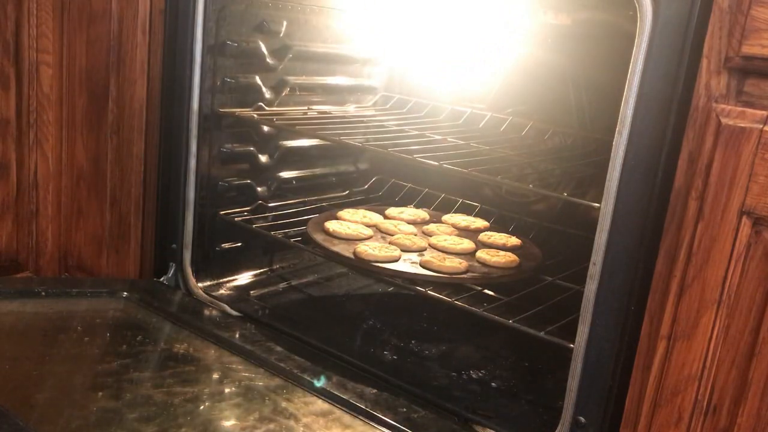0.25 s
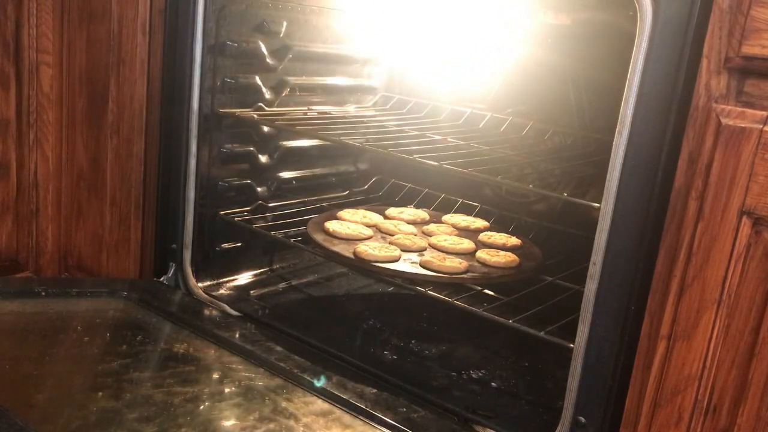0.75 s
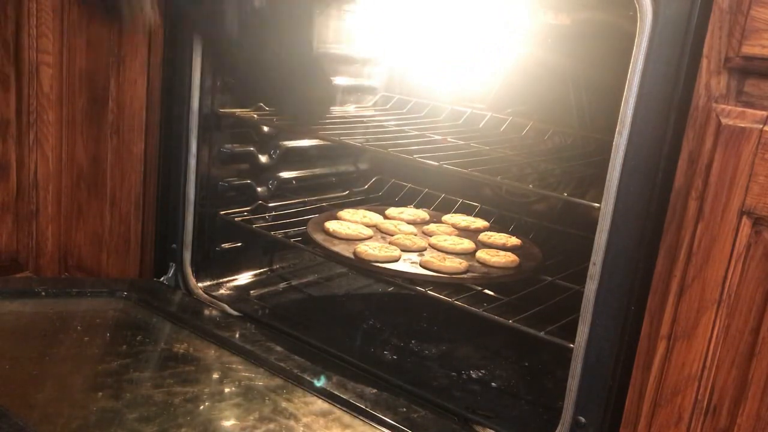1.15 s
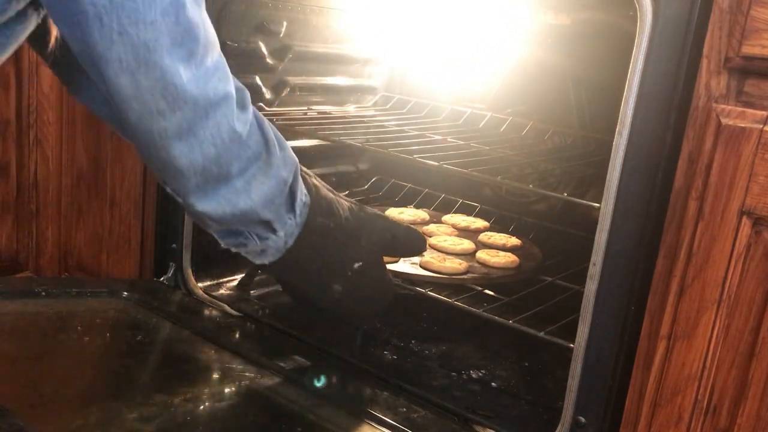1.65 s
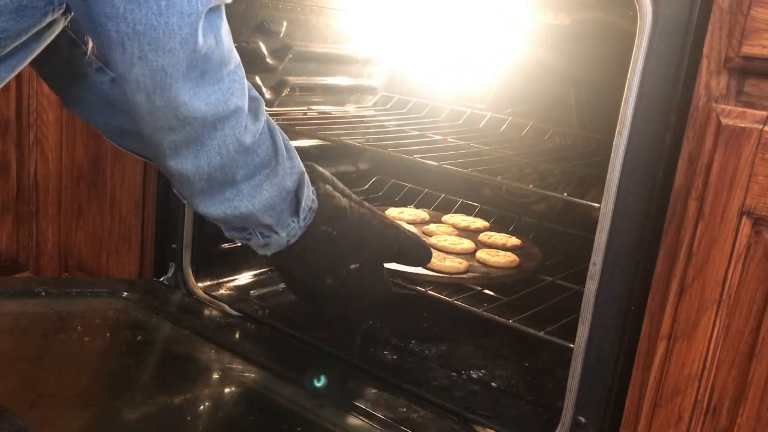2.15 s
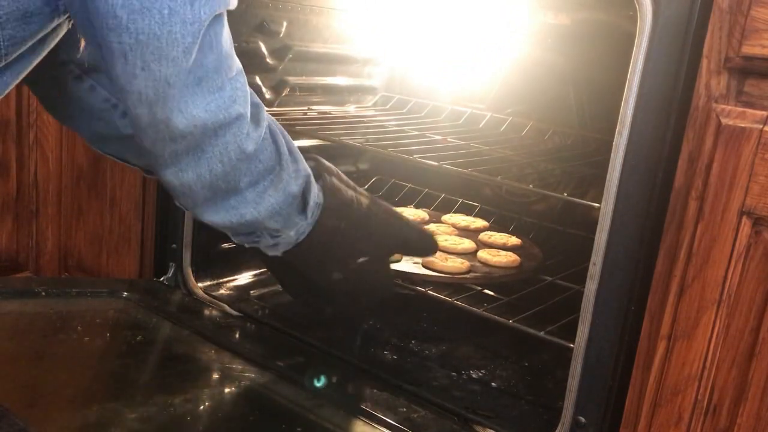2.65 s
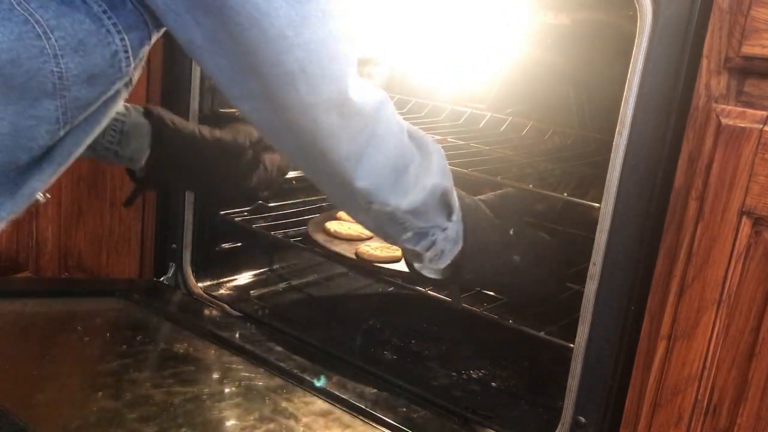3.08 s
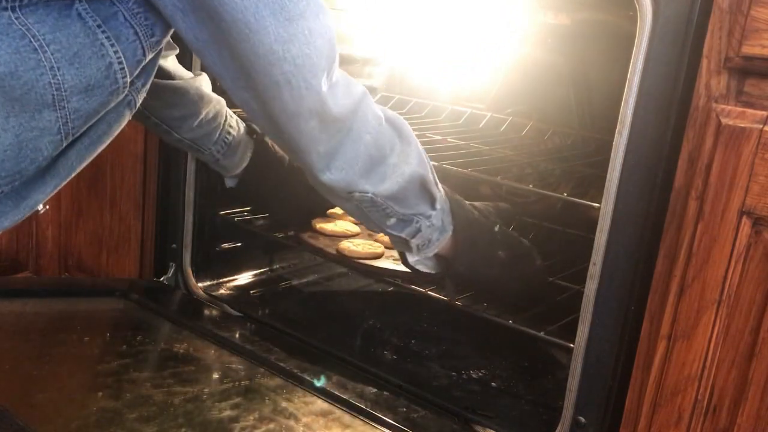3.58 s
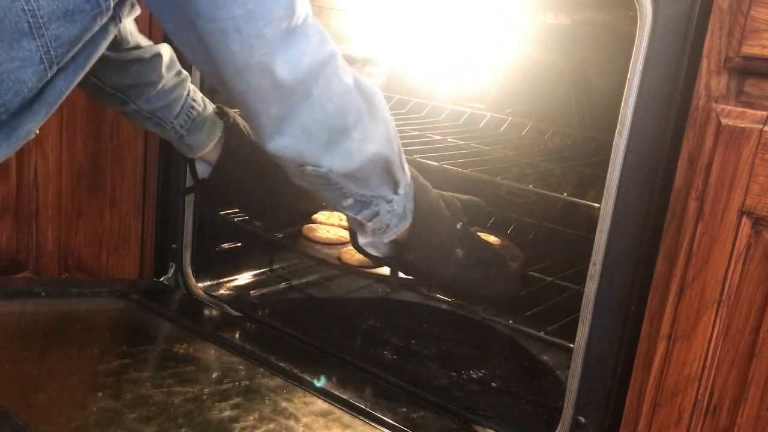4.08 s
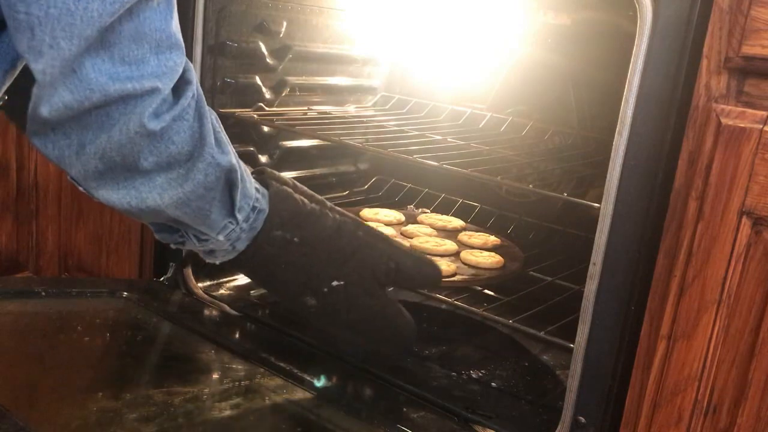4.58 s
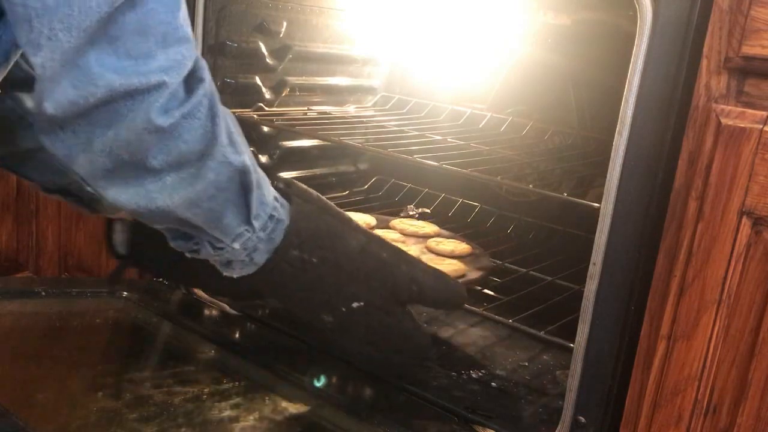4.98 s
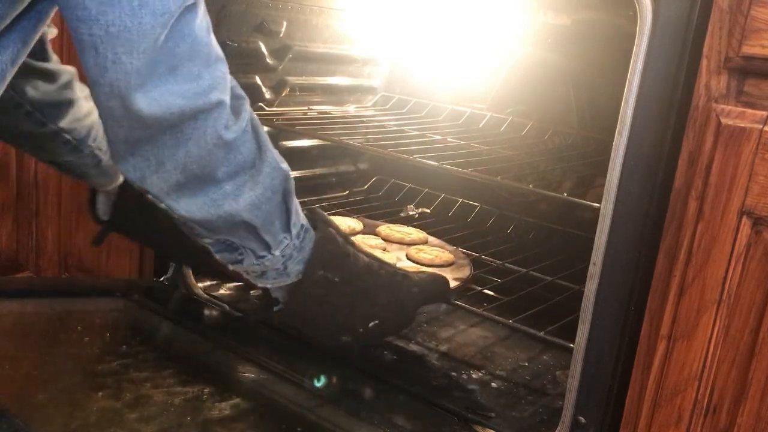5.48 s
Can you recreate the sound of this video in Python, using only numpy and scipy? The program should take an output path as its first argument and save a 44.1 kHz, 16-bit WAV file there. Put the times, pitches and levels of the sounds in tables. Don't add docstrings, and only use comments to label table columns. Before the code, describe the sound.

Close, nearly centred pickup beside an open oven. Two loud, dry wooden raps with low thumps open the scene. After a hushed stretch of tiny ticks and faint glove brushing, a metal pan nudges, scrapes and squeaks on wire bars, drops with a clank, catches, then bangs down in a rapid clatter. A ringing rack and last small scrapes close it, in a small, lightly reverberant kitchen.

```python
import sys
import numpy as np
from scipy import signal
from scipy.fft import rfft, irfft
from scipy.io import wavfile

SR = 44100
rng = np.random.default_rng(int(sys.argv[2]) if len(sys.argv) > 2 else 0)


def gain_from_db(level_db):
    decades = np.asarray(level_db, float) / 20
    return 10 ** decades


def wrap_up_sound(samples):
    columns = np.atleast_2d(samples).T
    tamed = np.clip(columns, -1, 1)
    steps = np.round(tamed * 32767).astype(np.int16)
    wavfile.write(sys.argv[1], SR, steps)


N = 252693

# (frequency [Hz], density [dB per Hz])
AIR_SPECTRUM = [(15, -32), (25, 8.5), (70, 1.5), (317, -1.5), (516, -6), (2220, -18.5), (2990, -15),
                (4870, -20.5), (12900, -27), (14800, -21.5), (16000, -68)]
AIR_DB = -64.5
# (frequency [Hz], t60 [s])
ROOM_DECAY = [(60, 0.72), (160, 0.49), (420, 0.43), (1100, 0.49), (2910, 0.5), (7680, 0.36)]
# (delay [s], level [dB])
ECHOES = [(.0021, -30), (.0078, -12.5), (0.017, -17), (0.022, -46)]

# (time [s], hold [s], level [dB], fall [dB/s])
TREADS = [(.27, 0.018, -24, 339), (.43, 0.042, -38, 99), (0.891, 0.01, -20.5, 425.5),
          (1.04, 0.04, -37, 143), (1.25, 0.43, -51, 200), (1.721, 0.025, -54.5, 21), (2.89, 0.26, -49, 60),
          (3.58, 0.22, -35.5, 43), (4.2, 0.42, -51, 26), (4.79, 0.12, -43.5, 22), (5.0, 0.029, -29.5, 172),
          (5.2, 0.013, -38, 71), (5.53, .03, -48, 85), (5.72, .02, -45, 68)]
TREAD_RISE_DB_PER_S = 750

# (time [s], peak [dB], snap pitch [Hz], woody body [dB re snap], body t60 [s])
KNOCKS = [(0.2486, -6, 2960, -8, 0.075), (0.2485, -10.5, 1660, -35.5, 0.056),
          (0.2576, -18.5, 3000, -35, .35), (0.264, -26, 3240, -26, .05), (.395, -27.5, 3000, -8, 0.097),
          (0.868, -21, 2435, -13, 0.046), (0.8691, -10.5, 2460, -7.5, 0.027),
          (0.8704, -15, 2340, -1.5, 0.057), (0.8721, -8.5, 2580, -2.5, 0.037),
          (0.8738, -12.5, 3900, -25.5, 0.031), (0.8753, -14.5, 3270, -12.5, 0.7),
          (0.88, -27, 3150, -18, 0.065)]
# (frequency [Hz], level [dB])
CABINET_BODY = [(88, -32), (150, 3.5), (278, -7.5), (833, -10.5), (1460, -9), (2400, -14), (4400, -20),
                (15000, -28.5)]
# (time [s], peak [dB], centre [Hz], width [Hz])
THROWN = [
    (0.2482, -5.5, 3075, 1480),
    (.2487, -13.5, 1700, 500),
    (.395, -25, 3000, 1500),
    (.871, -1, 2700, 1700),
    (.871, -11.5, 1090, 900),
]
SNAP_WIDTH = 0.12
SPLINTER_DB, SPLINTER_T60_S = -26, .002

# (time [s], peak [dB], pitch [Hz], t60 [s], deep boom [dB re note])
BUMPS = [(0.108, -51, 227, 0.2, -20), (0.255, -31, 313, 0.23, -24), (0.273, -11.5, 245, 0.027, -9),
         (0.403, -33, 173.5, 0.16, -0.5), (0.869, -23.5, 330, 0.072, 2.5), (0.876, -30.5, 524, 0.1, -7.5),
         (0.907, -23.5, 185, 0.074, -8), (1.027, -50, 127, 0.044, 10.5), (1.183, -59.5, 121, 0.1, 6),
         (1.684, -41.5, 235, 0.095, -7), (1.873, -46, 227.7, 0.19, -26), (2.627, -47.5, 237, 0.087, -22),
         (2.728, -45, 229, 0.2, -19), (3.042, -40, 213, 0.15, -10), (3.374, -54.5, 330, 0.21, -2.5),
         (3.512, -33, 170, 0.32, -9), (4.244, -38.5, 227, 0.21, -9.5), (4.579, -48, 303, 0.13, -4),
         (4.762, -41.5, 219, 0.3, -18), (4.909, -33.5, 208.5, 0.24, -5), (5.071, -16.5, 196, 0.057, -24),
         (5.189, -25, 244, 0.12, -3.5), (5.53, -37.5, 241.5, 0.28, -4)]
LIGHT_BOOM_HZ, HEAVY_BOOM_HZ, HEAVY_FROM_DB = 103.6, 68.7, -37

# (time [s], hold [s], level [dB])
RUSTLES = [(.42, .2, -60), (.7, .15, -67.5), (0.951, 0.26, -63.5), (1.2, .15, -66), (1.38, 0.23, -65.5),
           (2.151, 0.072, -67.5), (2.45, 0.015, -70.5), (2.726, 0.16, -59), (2.99, 0.058, -59),
           (3.15, 0.0083, -64.5), (3.22, 0.026, -60.5), (3.389, 0.0023, -62.5), (3.562, 0.026, -45),
           (3.66, 0.074, -58.5), (3.78, 0.2, -51.5), (4.04, 0.067, -61.5), (4.14, 0.054, -55),
           (4.256, 0.0018, -52), (4.47, 0.016, -67), (4.591, 0.005, -62), (4.77, 0.012, -78),
           (4.91, 0.19, -44), (5.07, 0.0052, -38), (5.17, 0.017, -52), (5.33, 0.054, -62.5),
           (5.541, 0.2, -52.5), (5.67, .1, -46)]
RUSTLE_RISE_DB_PER_S, RUSTLE_FALL_DB_PER_S = 219, 177
# (time [s], hold [s], level [dB])
SWISHES = [(1.755, 0.0088, -80), (2.211, .01, -66), (2.74, 0.11, -57.5), (3.0, 0.019, -59),
           (3.15, .008, -66), (3.22, 0.052, -57), (3.38, 0.0091, -63), (3.58, .025, -59), (3.8, .15, -59),
           (4.18, 0.018, -56), (4.48, 0.0091, -65), (4.59, .006, -76), (4.96, 0.093, -64), (5.17, .02, -57),
           (5.33, 0.049, -64.5), (5.53, .05, -66), (5.62, 0.1, -50)]
SWISH_RISE_DB_PER_S, SWISH_FALL_DB_PER_S, SWISH_FROM_HZ = 250, 334, 5200

# (start [s], end [s], pitch [Hz], width [Hz], level [dB])
WHINES = [(3.48, 3.56, 4250, 120, -64), (3.55, 3.6, 3120, 150, -52), (3.78, 4.0, 3880, 60, -62),
          (3.84, 3.98, 6610, 60, -66), (3.98, 4.25, 4250, 60, -66), (4.08, 4.25, 5800, 60, -68),
          (5.495, 5.6, 2150, 300, -60), (5.58, 5.73, 4100, 90, -60), (3.692, 3.712, 3240, 150, -43),
          (4.0, 4.25, 2770, 50, -63), (4.13, 4.25, 7500, 220, -62), (5.335, 5.47, 850, 14, -59),
          (5.31, 5.5, 786, 8, -59), (3.752, 3.79, 2900, 120, -57), (3.752, 3.84, 1730, 40, -58),
          (3.752, 3.86, 1120, 90, -58), (3.85, 3.91, 3070, 110, -57), (3.85, 3.89, 2500, 90, -61),
          (3.895, 3.97, 1080, 80, -57), (3.22, 3.32, 1680, 90, -69)]

# (time [s], rack level [dB], pan level [dB])
STRIKES = [
    (1.684, -75, -79),
    (3.045, -55.5, -60),
    (3.512, -56, -56.5),
    (3.694, -61, -56.5),
    (4.246, -54, -48),
    (4.761, -52, -54.5),
    (4.911, -64, -59),
    (5.071, -57, -48),
    (5.2, -39, -72),
    (5.525, -46, -56),
]
# (pitch [Hz], level [dB], t60 [s])
RACK_MODES = [(323, -2, .9), (780, -8, 1.0), (850, -1, .55), (890, -10, .6), (1163, -8, .3),
              (1500, -10, .5), (1600, -11, .4), (2600, -18, .45), (2864, -20, .7), (3042, -22, .6),
              (3885, -23, .7), (4070, -19, .3)]
# (pitch [Hz], level [dB], t60 [s])
PAN_MODES = [(506, -3, .4), (806, -8, .8), (867, -5, 1.6), (880, -9, 1.2), (937, -6, 1.6), (1044, -1, .75),
             (1583, -7, .6), (1642, -7, .7), (1723, -2, 1.3), (2380, -10, .35), (2748, -8, .9),
             (2920, -14, .5), (4371, -20, .35), (5696, -20, .33)]

# (pitch [Hz], level [dB], t60 [s])
NOTES_NUDGE = [(495, -4, 0.091), (955, 2, 0.11), (990, -6, 0.27), (1570, -1, 0.098), (2150, -7, 0.093),
               (2510, -1, .07), (3080, -8, 0.077), (3700, -2, .08)]
NOTES_DROP = [(900, -6, 0.13), (1046, -16, 0.17), (1520, -3.5, 0.13), (1960, -11, .1), (2125, -4.5, 0.098),
              (2750, -5, 0.065), (3620, -3, 0.081), (3900, 3, 0.064)]
NOTES_CATCH = [(715, 3, 0.12), (1480, 4.5, 0.29), (1850, -10, .15), (2800, -2, 0.098), (3150, -6, .08),
               (3461, -13, .08)]
NOTES_PULL = [(1200, 4, 0.092), (1610, -3, 0.22), (2112, 1.5, 0.13), (2250, -8, 0.093), (3040, -1, .1),
              (3680, -20, 0.067), (4430, -16, 0.069)]
NOTES_BOUNCE = [(1320, -3, .08), (1520, -2, .12), (2719, -5, .1), (3420, 0, 0.084), (3903, -7, .1),
                (4280, -2, 0.11)]
NOTES_CRASH = [(1174, 1, .12), (1377, -1.5, 0.16), (1593, -5.5, 0.23), (1949, -2, 0.095),
               (2270, -1.5, 0.06), (2650, -6.5, .15), (2990, -0.5, .1), (3330, -9, 0.083),
               (4340, -0.5, 0.064)]
# (time [s], level [dB], notes [table])
CLANKS = [
    (3.042, -43, NOTES_NUDGE),
    (4.2444, -36.5, NOTES_DROP),
    (4.759, -42, NOTES_CATCH),
    (4.91, -30, NOTES_PULL),
    (5.012, -33, NOTES_BOUNCE),
    (5.071, -29, NOTES_CRASH),
    (5.079, -34.5, NOTES_CRASH),
]

# (time [s], peak [dB], centre [Hz], t60 [s], dull part [dB])
TICKS = [(3.043, -43, 9000, .03, -10), (1.752, -56, 13000, .04, -30), (2.203, -43, 13500, .03, -30),
         (2.206, -54, 2050, .04, -6), (2.452, -58, 6900, .06, -20), (5.502, -38, 2100, .04, -4),
         (5.524, -34, 1150, .06, -2)]
# (time [s], peak [dB], crack centre [Hz], chatter t60 [s], dull part [dB])
CATCHES = [(1.682, -44, 900, 0.03, 7), (1.696, -46, 2930, 0.06, 1), (1.751, -57, 1570, 0.034, -11),
           (2.202, -35.5, 6780, 0.027, -5.5), (2.204, -41.5, 11150, 0.026, -21),
           (2.451, -53.5, 3000, 0.028, 2), (3.04, -39, 960, 0.057, -2), (3.043, -38, 1570, 0.067, 0),
           (3.044, -30, 2450, 0.048, 11), (3.379, -43, 2840, 0.015, -2), (3.499, -43, 1900, 0.079, 15),
           (3.516, -39, 3000, 0.072, 0), (3.558, -54, 3000, .05, 2), (3.573, -31, 3000, 0.051, -4),
           (3.588, -25, 2860, 0.018, 5), (3.607, -35, 2780, 0.041, 15), (3.693, -28.5, 3130, 0.033, 3),
           (3.757, -36.5, 2740, 0.099, 4), (4.587, -48, 3300, 0.04, -5.5), (4.758, -29.5, 2660, 0.053, -1),
           (5.581, -41, 1520, 0.0398, -10), (5.674, -36, 3000, 0.0495, 6), (5.563, -54, 1954, 0.05, -2)]
# (time [s], peak [dB], crack centre [Hz], dull part [dB])
LANDINGS = [(4.244, -26, 1650, -7), (4.246, -30.5, 923, -26), (4.25, -25.5, 2110, 0),
            (4.907, -29, 2840, -3), (4.913, -18.5, 1920, 16), (4.925, -24.5, 2250, 12),
            (4.955, -25, 2000, -8), (4.979, -26.5, 1880, 1), (5.009, -22, 3440, 11),
            (5.015, -20.5, 1550, 3), (5.026, -19, 1520, 10), (5.067, -15, 2420, 11),
            (5.073, -12.5, 2150, 12), (5.081, -16, 1580, -3.5), (5.097, -17.5, 1540, 17.5),
            (5.106, -34, 2850, 7), (5.121, -35, 1070, 0), (5.203, -39, 704, 3)]
LANDING_T60_S = 0.054
CATCH_RISE_S, LANDING_RISE_S = 0.0067, 0.0024
CATCH_TREBLE_DB, LANDING_TREBLE_DB, TICK_TREBLE_DB = -10.5, -19, -41

# (time [s], hold [s], scrape level [dB], shell rumble [dB re
# scrape], squeal [dB re scrape])
PULLS = [(.41, 0.015, -56.5, 4.5, -35), (.62, 0.29, -67.5, -12, -27), (1.0, 0.11, -88, -9, -30),
         (1.25, 0.3, -76, 0, -27), (1.706, 0.011, -58, 8.5, -26), (2.17, 0.024, -67.5, -1, -28.5),
         (2.69, 0.14, -73, -14, 7), (2.997, 0.13, -61, 3, -1), (3.23, 0.023, -67.5, 5.5, 9.5),
         (3.39, 0.0046, -61.5, 4.5, -25), (3.57, 0.029, -44, 6, -9.5), (3.697, 0.0081, -48.5, 7.5, -3.5),
         (3.76, 0.2, -55, 4.5, 4.5), (4.04, 0.15, -62, 2, -7), (4.27, 0.026, -58, 7.5, 4),
         (4.42, 0.12, -67.5, 4, -17), (4.59, 0.045, -62.5, 0.5, -10), (4.776, 0.12, -50, -1, -0.5),
         (4.909, 0.11, -40.5, -10, -25), (5.015, .04, -38.5, -14, -22), (5.054, 0.066, -31, -7.5, -36),
         (5.22, 0.2, -60.5, 15, -15), (5.536, 0.041, -43, 4.5, -34), (5.66, .1, -50.5, -7, -7)]
PULL_RISE_DB_PER_S, PULL_FALL_DB_PER_S, SHELL_FALL_DB_PER_S = 429, 132, 61
# (pitch [Hz], width [Hz], level [dB])
SHELL_MODES = [(116, 11, -17), (170, 20, -0.5), (239.4, 18, 1), (326.5, 6.5, 4), (430, 120, -8.5)]
# (pitch [Hz], width [Hz], level [dB])
SQUEAL_MODES = [(330, 140, 0), (730, 63, -10.5), (1170, 79, -10), (1680, 26, -12.5), (2590, 45, -11),
                (3000, 120, -5), (3970, 250, -8.5), (8940, 200, -13.5)]
# (frequency [Hz], density [dB per Hz])
SCRAPE_SPECTRUM = [(260, 6.5), (450, 0.5), (553, 6.5), (1060, 5), (1280, 6), (2120, -5), (2460, -6),
                   (2960, -11), (3640, -44.5), (7000, -17.5), (9100, -71.5), (15400, -120)]
# (frequency [Hz], density [dB per Hz])
HISS_SPECTRUM = [(880, -37), (1500, 3), (2400, 2.5), (4250, 1.5), (5000, -2.5), (6550, -1), (10500, -8),
                 (14800, -8.5)]
IDLE_SCRAPE_DB, IDLE_RUMBLE_DB, IDLE_HISS_DB, IDLE_TREAD_DB = -75, -73.5, -80.5, -78.5


def unit_rms(x):
    return x / np.sqrt(np.mean(x ** 2) + 1e-20)


def unit_peak(x):
    return x / np.max(np.abs(x))


def at_hz(points, hz):
    points = np.array(points)
    return np.interp(np.log(hz), np.log(points[:, 0]), points[:, 1])


def add(out, s, piece):
    start = round(s * SR)
    out[start:start + len(piece)] += piece[:len(out) - start]


def drift(rate_hz):
    hop, settle = 40, 2000
    r = np.exp(-2 * np.pi * rate_hz * hop / SR)
    white = rng.standard_normal(N // hop + 2 + settle)
    slow = signal.lfilter([1], [1, -2 * r, r * r], white)[settle:]
    return np.interp(np.arange(N) / hop, np.arange(len(slow)), unit_rms(slow))


def low_pass(x, hz):
    return signal.lfilter(*signal.butter(2, min(hz, .45 * SR), fs=SR), x)


def resonance(x, hz, width_hz):
    r = np.exp(-np.pi * width_hz / SR)
    top = np.array([1, 0, -1]) * (1 - r * r) / 2
    return signal.lfilter(top, [1, -2 * r * np.cos(2 * np.pi * hz / SR), r * r], x)


def bands():
    edges = 28 * 2 ** np.arange(0, 9.6, .5)
    return [(np.sqrt(low * high), signal.butter(2, [low, high], "band", fs=SR, output="sos"))
            for low, high in zip(edges, edges[1:])]


def coloured(x, spectrum):
    hz = np.maximum(np.fft.rfftfreq(len(x), 1 / SR), 1)
    below = np.maximum(np.log2(spectrum[0][0] / hz), 0)
    above = np.maximum(np.log2(hz / spectrum[-1][0]), 0)
    gain = gain_from_db(at_hz(spectrum, hz) - 8.0 * (below + above))
    return unit_rms(irfft(rfft(x) * gain, len(x)))


def grit(per_s, spread_db, size):
    strengths = gain_from_db(spread_db * np.minimum(rng.exponential(1, size), 4))
    strengths = strengths * rng.choice([-1, 1], size)
    return unit_rms(strengths * (rng.random(size) < per_s / SR))


def swells(s, held_s, level_db, rise, fall, idle_db):
    t = np.arange(0, N + 64, 64)[:, None] / SR
    before = np.maximum(s - t, 0)
    after = np.maximum(t - s - held_s, 0)
    each_db = level_db - rise * before - fall * after
    power = np.sum(gain_from_db(each_db) ** 2, axis=1) + gain_from_db(idle_db) ** 2
    return np.interp(np.arange(N) / SR, t[:, 0], 10 * np.log10(power))


def room_air():
    mid = gain_from_db(AIR_DB) * coloured(rng.standard_normal(N), AIR_SPECTRUM)
    side = coloured(rng.standard_normal(N), AIR_SPECTRUM)
    return mid, gain_from_db(AIR_DB - 29.5) * np.diff(side, prepend=0)


def kitchen(x, tail_db, side_db):
    t = np.arange(int(.7 * SR)) / SR
    white, tail = rng.standard_normal((2, 2, len(t))), 0
    for k, (hz, band) in enumerate(bands()):
        fade = gain_from_db(-60 * t / at_hz(ROOM_DECAY, hz))
        tail = tail + signal.sosfilt(band, white[k % 2]) * fade
    tail = gain_from_db(tail_db) * tail * np.minimum(t / 0.0013, 1)
    for s, db in ECHOES:
        tail[0, round(s * SR)] += gain_from_db(db)
    mid, side = signal.fftconvolve(x[None], tail, axes=1)[:, :N]
    return mid, gain_from_db(side_db) * (np.diff(side, prepend=0) + .06 * low_pass(side, 500))


def tread():
    s, held_s, level_db, fall = np.transpose(TREADS)
    push = rng.standard_normal(N)
    upper = resonance(resonance(push, 69.7, 47), 69.7, 47)
    lower = resonance(resonance(push, 48, 25), 48, 25)
    effort_db = swells(s, held_s, level_db, TREAD_RISE_DB_PER_S, fall, IDLE_TREAD_DB)
    return gain_from_db(effort_db - 10.0) * unit_rms(upper - 0.51 * lower)


def knocks():
    out, sent, t = np.zeros(N), np.zeros(N), np.arange(SR // 2) / SR
    click = 1. * (t == 0)
    blow = resonance(low_pass(low_pass(click, 11000), 11000), 3730, 3900)
    edge = 0.069 * resonance(blow, 5800, 1500) + 0.036 * resonance(blow, 8200, 6000)
    for s, peak_db, hz, body_db, t60 in KNOCKS:
        white, body = rng.standard_normal((2, len(t))), 0
        splinters = gain_from_db(SPLINTER_DB - 60 * t[:160] / SPLINTER_T60_S) * white[0, -160:]
        crumbs = click[:160] + splinters
        snap = resonance(blow, hz, SNAP_WIDTH * hz) + signal.lfilter(crumbs, 1, edge)
        for k, (centre, band) in enumerate(bands()):
            fade = gain_from_db(-60 * t / (t60 * (centre / 1000) ** -.3))
            onset = np.minimum(t * centre, 1)
            wood = signal.sosfilt(band, white[k % 2] * fade * onset)
            body = body + gain_from_db(at_hz(CABINET_BODY, centre)) * wood
        body = gain_from_db(peak_db + body_db) * unit_peak(body)
        add(out, s, gain_from_db(peak_db) * unit_peak(snap) + body)
        add(sent, s, body)
    for s, peak_db, hz, width_hz in THROWN:
        pulse = resonance(blow, hz, width_hz) + 1.5 * edge
        add(sent, s, gain_from_db(peak_db) * unit_peak(pulse))
    return out, sent


def bumps():
    out, t = np.zeros(N), np.arange(SR // 2) / SR
    for s, peak_db, hz, t60, boom_db in BUMPS:
        boom_hz = np.interp(peak_db - HEAVY_FROM_DB, [-3, 0], [LIGHT_BOOM_HZ, HEAVY_BOOM_HZ])
        rise = 1 - np.exp(-t / 0.0033)
        note = np.sin(2 * np.pi * hz * t) * gain_from_db(-60 * t / t60)
        partner = np.sin(2 * np.pi * (1.2 * hz * t + rng.random())) * gain_from_db(-80 * t / t60)
        boom = gain_from_db(boom_db) * np.sin(2 * np.pi * boom_hz * t) * gain_from_db(-60 * t / (1.6 * t60))
        add(out, s, gain_from_db(peak_db) * rise * (note + .5 * partner + boom))
    return out


def swish():
    level_db = swells(*np.transpose(SWISHES), SWISH_RISE_DB_PER_S, SWISH_FALL_DB_PER_S, -110)
    treble = signal.butter(2, SWISH_FROM_HZ, "high", fs=SR, output="sos")
    fibres = signal.sosfilt(treble, grit(16030, 1.3, size=N))
    sheen = sum(resonance(fibres, hz, 118) for hz in (8300, 9500, 11700, 12300, 14500))
    return gain_from_db(level_db + 1.1 * drift(60)) * unit_rms(fibres + 1.5 * sheen)


def whines():
    out = np.zeros(N)
    settle = 8192
    for start, end, hz, width_hz, level_db in WHINES:
        rubbing = rng.standard_normal(SR // 2 + settle)
        tone = resonance(resonance(rubbing, hz, width_hz), hz, width_hz)
        along = np.arange(SR // 2) / SR / (end - start)
        swell = np.sqrt(np.sin(np.pi * np.minimum(along, 1)) + 1e-12)
        add(out, start, gain_from_db(level_db) * unit_rms(tone[settle:]) * swell)
    return out


def ringing(force, modes):
    out = 0
    for k, (hz, level_db, t60) in enumerate(modes):
        width_hz = np.log(1000) / (np.pi * t60)
        gain = gain_from_db(level_db) * SR / (2 * np.pi * width_hz)
        out = out + (-1) ** k * gain * resonance(force, hz, width_hz)
    return out


def metal(rub):
    s, rack_db, pan_db = np.transpose(STRIKES)
    rack, pan = rub + 1e-18, rub + 1e-18
    rack[(s * SR).astype(int)] += gain_from_db(rack_db)
    pan[(s * SR).astype(int)] += gain_from_db(pan_db)
    return ringing(rack, RACK_MODES) + ringing(pan, PAN_MODES)


def clanks():
    out, t = np.zeros(N), np.arange(SR // 2) / SR
    for s, level_db, notes in CLANKS:
        hz, note_db, t60 = np.transpose(notes)[:, :, None]
        fade = gain_from_db(note_db - 60 * t / np.minimum(t60, .25))
        bloom = 1 - np.exp(-t * hz / 1.7)
        sign = (-1) ** np.arange(len(notes))[:, None]
        rings = sign * fade * bloom * np.sin(2 * np.pi * hz * t)
        add(out, s, gain_from_db(level_db - np.max(note_db)) * np.sum(rings, axis=0))
    return out


def contacts():
    catches = [(*row, CATCH_TREBLE_DB, CATCH_RISE_S) for row in CATCHES]
    landings = [(s, db, hz, LANDING_T60_S, dull_db, LANDING_TREBLE_DB, LANDING_RISE_S)
                for s, db, hz, dull_db in LANDINGS]
    ticks = [(*row, TICK_TREBLE_DB, CATCH_RISE_S) for row in TICKS]
    return catches + landings + ticks


def hits():
    out, t = np.zeros(N), np.arange(4096) / SR
    treble = signal.butter(2, [5500, 14000], "band", fs=SR, output="sos")
    for s, peak_db, hz, t60, dull_db, treble_db, rise_s in contacts():
        envelope = gain_from_db(-60 * t / t60) * np.minimum(t / rise_s, 1)
        chatter = grit(12000, 2.34, size=len(t)) * envelope
        crack = resonance(chatter, hz, 0.14 * hz) + 1.6 * resonance(chatter, hz, 0.034 * hz)
        overtone = 0.3 * resonance(chatter, 1.9 * hz, .5 * hz)
        dull = gain_from_db(dull_db) * resonance(chatter, 1000, 2970)
        tone = low_pass(crack + overtone + dull, 1.93 * hz)
        tone = tone + gain_from_db(treble_db) * signal.sosfilt(treble, chatter)
        add(out, s, gain_from_db(peak_db) * unit_peak(tone))
    return out


def drag():
    s, held_s, pull_db, shell_db, sing_db = np.transpose(PULLS)
    scrape_db = swells(s, held_s, pull_db, PULL_RISE_DB_PER_S, PULL_FALL_DB_PER_S, IDLE_SCRAPE_DB)
    rumble_db = swells(s, held_s, pull_db + shell_db, PULL_RISE_DB_PER_S, SHELL_FALL_DB_PER_S, IDLE_RUMBLE_DB)
    squeal_db = swells(s, held_s, pull_db + sing_db, PULL_RISE_DB_PER_S, PULL_FALL_DB_PER_S,
                       IDLE_SCRAPE_DB - 21) - scrape_db
    hiss_db = swells(*np.transpose(RUSTLES), RUSTLE_RISE_DB_PER_S, RUSTLE_FALL_DB_PER_S, IDLE_HISS_DB)

    shake = grit(900, 4.25, size=N)
    rumble = unit_rms(sum((-1) ** k * gain_from_db(db) * unit_rms(resonance(shake, hz, width_hz))
                          for k, (hz, width_hz, db) in enumerate(SHELL_MODES)))
    rumble = gain_from_db(rumble_db + 1.1 * drift(28.0)) * rumble

    slips = grit(5000, 1.1, size=N)
    scrape_gain = gain_from_db(scrape_db + 3.3 * drift(22))
    squeal = unit_rms(sum(gain_from_db(db + 4.5 * drift(6.5)) * unit_rms(resonance(slips, hz, width_hz))
                          for hz, width_hz, db in SQUEAL_MODES))
    scrape = scrape_gain * (coloured(slips, SCRAPE_SPECTRUM) + gain_from_db(squeal_db) * squeal)

    grains = coloured(grit(14000, 0.86, size=N), HISS_SPECTRUM)
    sheen = sum(resonance(grains, hz, 160) for hz in (5646, 6640, 7150, 9630, 11470, 12600, 14520))
    sheen = gain_from_db(np.minimum(squeal_db, 0) + 1.5) * sheen
    flutter_db = .7 * drift(30) + .8 * drift(120)
    hiss = gain_from_db(hiss_db + flutter_db) * (grains + sheen)

    wire_force = gain_from_db(-60.5) * scrape_gain * slips
    return rumble + scrape + hiss, wire_force


def scene():
    rasp, rub = drag()
    rasp = rasp + swish()
    knocked, thrown = knocks()
    struck = hits() + clanks() + bumps() + metal(rub) + whines()
    room, room_side = kitchen(struck + thrown + gain_from_db(-4.5) * rasp, tail_db=-37.0, side_db=-22.5)
    air, air_side = room_air()
    mid = struck + knocked + rasp + room + tread() + air
    side = room_side + air_side
    return np.array([np.append(0, mid[:-1]) + side, mid - side])


def top_cut(x):
    return signal.sosfilt(signal.butter(12, 16670, fs=SR, output="sos"), x)


def record(dry):
    heard = signal.sosfilt(signal.butter(3, 42, "high", fs=SR, output="sos"), dry)
    heard = signal.sosfilt(signal.cheby2(14, 60, 16500, fs=SR, output="sos"), heard)
    return top_cut(heard)


dry = scene()
out = record(dry)
wrap_up_sound(out)
```